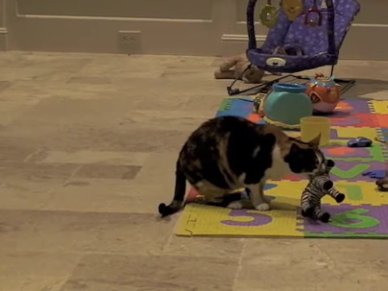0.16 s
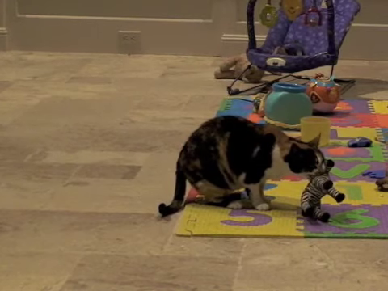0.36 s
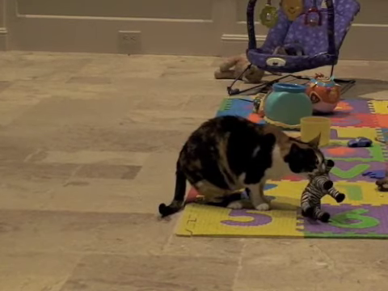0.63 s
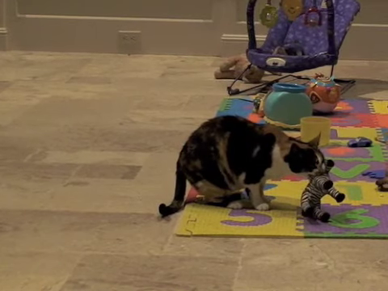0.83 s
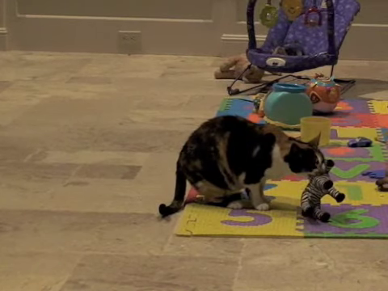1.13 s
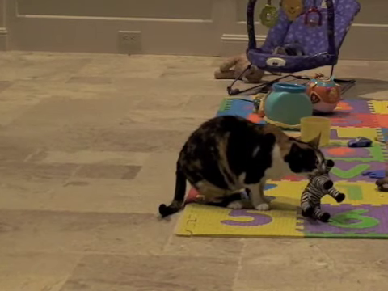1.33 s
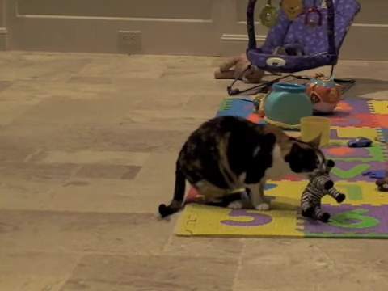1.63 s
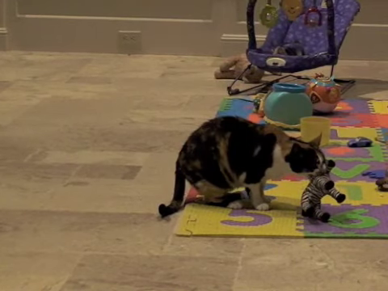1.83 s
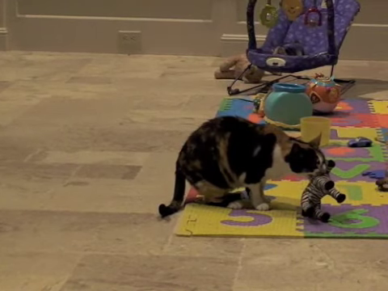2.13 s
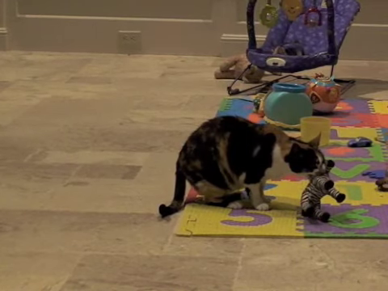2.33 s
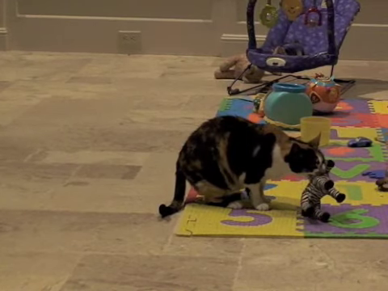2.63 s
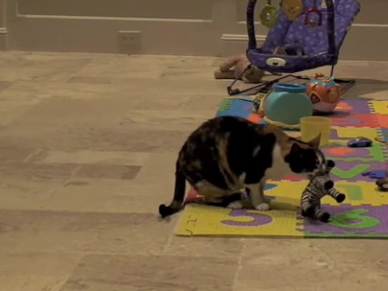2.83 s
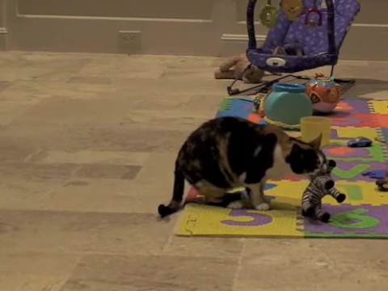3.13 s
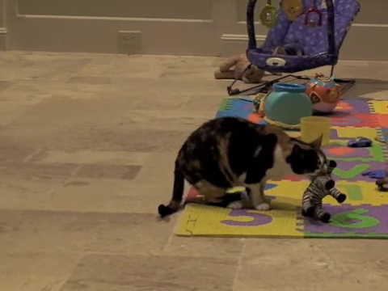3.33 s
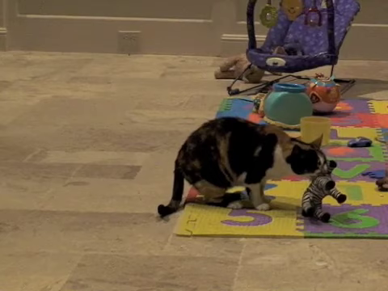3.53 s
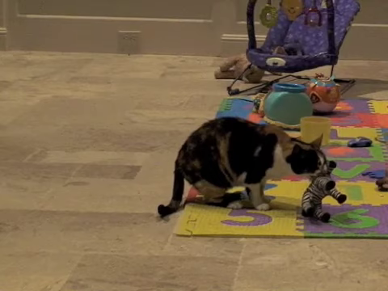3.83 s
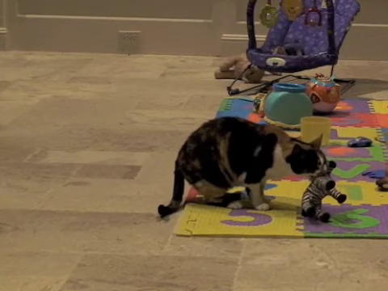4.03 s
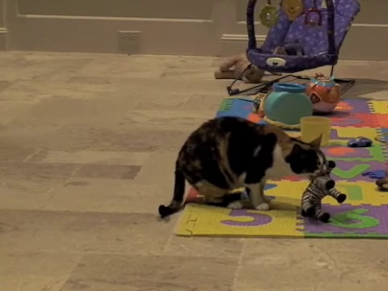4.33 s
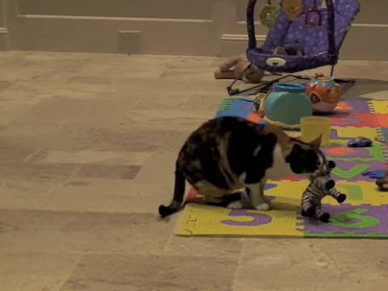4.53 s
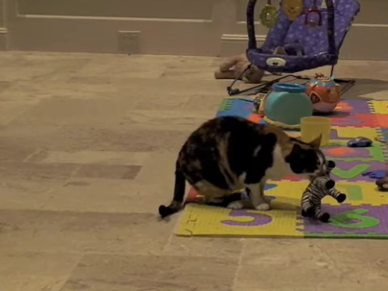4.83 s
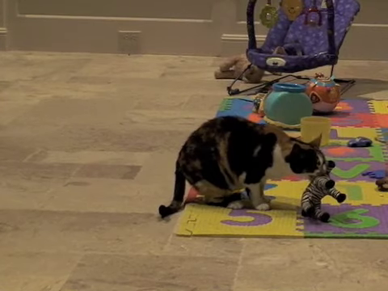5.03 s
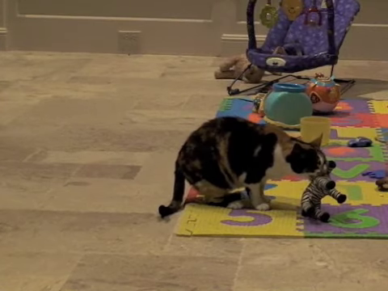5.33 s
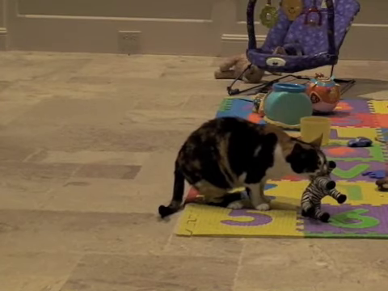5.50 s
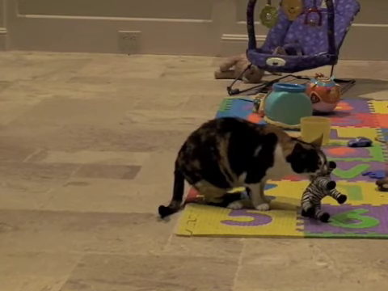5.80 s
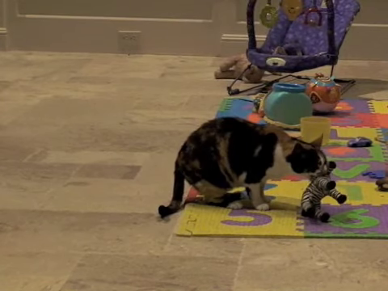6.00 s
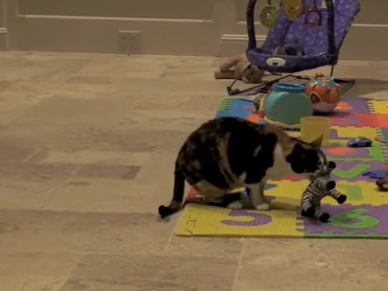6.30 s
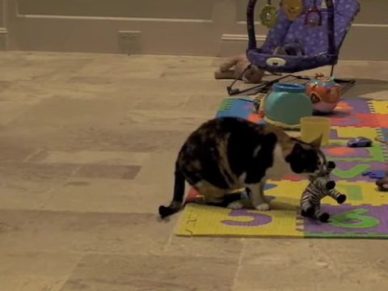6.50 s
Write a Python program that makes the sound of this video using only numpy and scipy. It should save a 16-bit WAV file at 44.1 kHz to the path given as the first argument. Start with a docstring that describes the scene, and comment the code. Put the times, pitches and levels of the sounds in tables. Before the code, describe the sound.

Quiet indoor room tone with a low, slowly swelling rumble. A cat yowls mournfully, its mid-high voice dipping and rising again as the mouth opens and closes. Three full calls follow the end of an earlier one, the middle one loudest and hoarse at its height, each breaking off into soft moans. Hard floor and walls leave a ringing tail over a second long; the microphone is a few metres away.

```python
"""In a bare, tiled room with a low ventilation rumble, an old cat sits on a play mat a few metres away.
We enter on the end of one yowl; three more follow, and each of the four breaks off into soft moans.
Each yowl is a stack of vocal-fold harmonics that sags in pitch and climbs again, shaped by a moving jaw.
Her parting lips are short ringing clicks, the soft bumps are noise pushed into dull resonances,
and the hard room is decaying noise convolved with cat, lips and bumps."""
import sys
import numpy as np
from scipy import signal
from scipy.fft import rfft, irfft, next_fast_len
from scipy.io import wavfile

SR = 44100
rng = np.random.default_rng(int(sys.argv[2]) if len(sys.argv) > 2 else 0)


def unload_audio(sound):
    """Save the sound as a 16-bit wav file, at the path given as the first command line argument."""
    columns = np.transpose(np.atleast_2d(sound))
    # keep every value between -1 and 1, then stretch to whole-number steps
    steps = np.round(np.clip(columns, -1, 1) * 32767)
    wavfile.write(sys.argv[1], SR, steps.astype(np.int16))


N = 293706
# the scene is built from a little before time 0, so that the room already rings when we enter
LEAD = int(0.6 * SR)
TIME = np.arange(-LEAD, N) / SR


def undb(db):
    """Decibels to amplitude gain."""
    return 10 ** (np.asarray(db) / 20)


def unit(x):
    """Scale to rms 1."""
    return x / np.sqrt(np.mean(x ** 2))


def gain_at(hz, points):
    """Gain of a (Hz, dB) spectrum, joined on a log-frequency axis."""
    f, db = np.transpose(points)
    return undb(np.interp(np.log(hz + 1), np.log(f), db))


def colour(x, response):
    """Filter by a gain that is a function of frequency."""
    size = next_fast_len(len(x))
    spectrum = rfft(x, size) * response(np.fft.rfftfreq(size, 1 / SR))
    return irfft(spectrum, size)[:len(x)]


def resonance(hz, centre_hz, width_hz):
    """Complex gain of a two-pole resonator, 1 in the bass."""
    return 1 / (1 - (hz / centre_hz) ** 2 + 1j * hz * width_hz / centre_hz ** 2)


def hump(hz, centre_hz, width_hz):
    """Bell from 0 to 1 around a resonance, half as high at width_hz to either side."""
    return 1 / (1 + ((hz - centre_hz) / width_hz) ** 2)


def bell(t, centre_s, half_s):
    """Smooth rise from 0 to 1 and back."""
    return np.exp(-((t - centre_s) / half_s) ** 2)


def ease(share):
    """Quarter sine from 0 to 1: quick at first, then level."""
    return np.sin(np.pi / 2 * np.clip(share, 0, 1))


def walk(t, rate):
    """Random wander with about `rate` turns a second."""
    steps = rng.standard_normal(8192)
    return np.interp((t - t[0]) * rate, np.arange(len(steps)), steps)


def during(start, length):
    """The sample times of one call."""
    return TIME[(TIME > start) & (TIME < start + length)]


def ports(mid, side, width):
    """Left and right of a diffuse sound: the stronger the side signal, the less alike they are."""
    side = colour(side, lambda f: gain_at(f, width))
    return np.array([mid + side, mid - side])


# spectrum of the still air of the room, before it is set to AIR_DB: frequency_hz, relative_level_db_per_hz
AIR_SPECTRUM = [(25, -10), (50, -6), (90, 1.5), (125, 0.5), (170, -3), (300, -5.5), (600, -4.5),
                (1200, -10.5), (2500, -17), (4000, -19), (6500, -24.5), (10500, -30.5), (12000, -26),
                (15500, -30.5)]
# stereo width of that air, which comes from all sides: frequency_hz, side_minus_mid_db
AIR_WIDTH = [(50, -25), (125, -22), (170, -14), (260, -8.5), (500, -5.5), (1300, -3), (2100, -2),
             (5600, -3.5), (10500, -2.5), (11200, -6), (12000, -38)]
# the low rumble and hum swell and ebb: time_s, gain_db
RUMBLE_SWELL = [(0, -0.5), (1.2, -1.5), (3, -2.5), (4.2, 0.5), (5.3, 1), (6.6, 1)]
AIR_DB = -55.5
HUM_HZ, HUM_DB = 123.1, -67  # hum level before its waver and the swell


def ventilation(hum_waver_db=3, rumble_hz=200):
    """Steady hiss of the house over a slowly swelling rumble and a faint wavering motor hum."""
    mid, side = (unit(colour(rng.standard_normal(len(TIME)), lambda f: gain_at(f, AIR_SPECTRUM)))
                 for _ in range(2))
    air = ports(mid, side, AIR_WIDTH) * undb(AIR_DB)
    rumble = np.array([colour(channel, lambda f: 1 / (1 + (f / rumble_hz) ** 4)) for channel in air])
    steady_hiss = air - rumble
    hum_phase = 2 * np.pi * HUM_HZ * TIME + 1.14 * walk(TIME, 5)
    hum_gain = undb(HUM_DB + hum_waver_db * walk(TIME, 2))
    hum = np.sqrt(2) * np.sin(hum_phase) * hum_gain
    swell = undb(np.interp(TIME, *np.transpose(RUMBLE_SWELL)))
    return steady_hiss + (rumble + hum) * swell


# how long the room rings: frequency_hz, t60_s
RING_TIMES = [(450, 1.3), (950, 1.38), (1350, 1.62), (2000, 1.55), (3200, 1.2), (6000, 1.05)]
# she faces away, so the walls get more of her treble than the listener: frequency_hz, reflected_share_db
FACING_AWAY = [(400, -1.5), (500, 0), (830, .5), (1000, -2), (1300, 1.3), (1700, 4), (2300, 5), (6000, 4)]
# stereo width of the echoes: frequency_hz, side_minus_mid_db
ECHO_WIDTH = [(100, -22), (250, -12), (500, -13), (1000, -10.5), (2000, -9), (4000, -7.5), (9000, -6)]
TAIL_DB, EARLY_DB = -2.5, -17


def room(x, direct_db=-2, early_s=0.056, gap_s=0.0049):
    """Direct sound, dense early reflections off tiles and walls, and a tail longest in the mid range."""
    t = np.arange(int(1.5 * SR)) / SR
    centres, t60s = np.transpose(RING_TIMES)

    def echoes():
        """One noise response: overlapping bands, each with its own decay, plus a short early burst."""
        noise = rng.standard_normal(len(t))
        bands = [colour(noise, lambda f: np.interp(f, centres, share)) for share in np.eye(len(centres))]
        tail = sum(band * 1000 ** (-t / t60) for band, t60 in zip(bands, t60s))
        tail = tail * np.sqrt(2 * np.log(1000) / (t60s.mean() * SR))
        early = rng.standard_normal(len(t)) * np.exp(-t / early_s) * np.sqrt(2 / (early_s * SR))
        return (undb(TAIL_DB) * tail + undb(EARLY_DB) * early) * (t > gap_s)

    radiated = colour(x, lambda f: gain_at(f, FACING_AWAY))
    response = ports(echoes(), echoes(), ECHO_WIDTH)
    wet = signal.fftconvolve(radiated[None], response, axes=1)[:, :len(x)]
    return undb(direct_db) * x + wet


# brief dropouts and swells of single low harmonics: centre_s, half_length_s, centre_hz, gain_db
FLUTTERS = [(3.123, 0.03, 870, -11), (3.224, 0.015, 855, 5), (3.347, 0.013, 855, -9),
            (3.556, 0.032, 1280, 5.5), (3.609, 0.025, 420, -17), (3.703, 0.022, 410, -12),
            (3.932, 0.015, 420, 7), (3.986, 0.015, 1280, -14), (4.094, .005, 880, -6),
            (4.1, .008, 880, 9.5), (5.428, 0.027, 890, -6), (5.572, 0.015, 890, -18),
            (5.667, 0.027, 870, -21), (5.67, 0.031, 435, 2), (5.836, 0.055, 445, -13),
            (5.903, 0.028, 890, 5), (6.252, .007, 980, -6), (6.266, .006, 980, 2)]


def flutter(x, width_hz=260):
    """Single harmonics briefly drop out or swell: a narrow band is turned down or up for a moment."""
    out = x
    for at, half_s, centre_hz, db in FLUTTERS:
        band = colour(x, lambda f: np.exp(-((f - centre_hz) / width_hz) ** 4))
        out = out + band * (undb(db) - 1) * bell(TIME, at, half_s)
    return out


# soft bumps and taps on the floor, levels before the room:
# start_s, level_db, centre_hz, decay_s, damping (resonance width over centre, no unit)
FLOOR_BUMPS = [(0.59, -44.5, 200, 0.033, 2.7), (1.603, -48.5, 155, 0.008, 0.58),
               (1.631, -46.5, 104, 0.017, 0.48), (2.577, -52, 750, 0.0097, 1.1),
               (4.67, -57, 65.2, 0.09, 1.5), (4.698, -47, 1300, .006, 0.29)]


def bump(start, db, centre_hz, decay_s, damping, soft_hz=1500):
    """A soft, scuffing push: decaying noise drives one dull resonance."""
    age = TIME - start
    envelope = (age > 0) * np.exp(-np.maximum(age, 0) / decay_s)
    push = rng.standard_normal(len(TIME)) * envelope

    def floor(f):
        return 1j * f * resonance(f, centre_hz, damping * centre_hz) / (1 + 1j * f / soft_hz)

    return unit(colour(push, floor)) * np.sqrt(np.mean(envelope ** 2)) * undb(db)


# lips parting: start_s, level_db (before the click's rise, decay and the room)
LIP_POPS = [(1.706, -37.5), (3.003, -43), (5.268, -37)]


def lip_pop(start, db, mouth_hz=1230, decay_s=0.0029, rise_s=0.0016):
    """The lips part and the air in the mouth rings for a few cycles."""
    age = np.maximum(TIME - start, 0)
    ring = np.sqrt(2) * np.sin(2 * np.pi * mouth_hz * age)
    return undb(db) * ring * np.exp(-age / decay_s) * (1 - np.exp(-age / rise_s))


def hiss(t, pitch, db, centre_hz=5200, width_hz=850, edge_s=.04):
    """Hoarse turbulence, puffed once a cycle."""
    noise = colour(rng.standard_normal(len(t)), lambda f: hump(f, centre_hz, width_hz))
    puffs = 1 + np.cos(2 * np.pi * np.cumsum(pitch) / SR)
    edges = ease(np.minimum(t - t[0], t[-1] - t) / edge_s)
    return np.interp(TIME, t, unit(noise * puffs) * undb(db) * edges, left=0, right=0)


# fixed colour of larynx and throat: frequency_hz, gain_db
THROAT_COLOUR = [(420, 3.7), (490, -.5), (840, 5), (1000, 1.4), (1300, 3.4), (1480, -1.5), (1700, -.5),
                 (1900, 0.7), (2130, -2.5), (2600, -2.2), (3300, -2.5), (4000, -1), (4800, 3), (5800, 3.5),
                 (7000, 1.5)]
# a thin, high ring is strongest at the start of a call and then dies away
RING_HZ, RING_WIDTH_HZ, RING_DB, RING_FADE_S = 5770, 260, 10.5, 0.69
# below this level the voice counts as soft: pinched in colour, richer in its fundamental
PLAIN_DB = -40


def voice(t, pitch, db, mouth, throat, upper, twang_db, fundamental_db,
          mouth_width_hz=235, throat_width_hz=370, throat_peak_db=12.5,
          upper_width_hz=340, upper_peak_db=11, twang_hz=1760,
          jitter=0.0026, waver=0.0016, shimmer_db=1.08, rasp_db=-34, unsteady=0.52,
          hoot_db_per_db=0.02, opening_hoot_db=3, opening_s=0.13, count=21):
    """Vocal-fold harmonics through three resonances set by jaw, tongue and lips, and a fixed high ring."""
    age = t - t[0]
    # on little air the folds beat unevenly; at full voice they lock in
    rough = undb(unsteady * np.clip(-31.5 - db, -10, 15))
    pitch = pitch * (1 + rough * (jitter * walk(t, 220) + waver * walk(t, 36.18)))
    phase = 2 * np.pi * np.cumsum(pitch) / SR
    k = np.arange(1, count + 1)[:, None]
    hz = k * pitch
    peaks_db = throat_peak_db * hump(hz, throat, throat_width_hz)
    peaks_db = peaks_db + upper_peak_db * hump(hz, upper, upper_width_hz)
    peaks_db = peaks_db + RING_DB * np.exp(-age / RING_FADE_S) * hump(hz, RING_HZ, RING_WIDTH_HZ)
    # pinched folds close more sharply and lift the upper harmonics
    lift_db = twang_db / (1 + (twang_hz / hz) ** 6)
    # a soft voice keeps more of its fundamental, most of all while the mouth is just opening
    hoot_db = fundamental_db + hoot_db_per_db * (PLAIN_DB - db) + opening_hoot_db * np.exp(-age / opening_s)
    gains = gain_at(hz, THROAT_COLOUR) * resonance(hz, mouth, mouth_width_hz)
    gains = gains * undb(peaks_db + lift_db + (k == 1) * hoot_db)
    # keep the power even, so that the level follows effort alone
    power = (abs(gains) ** 2).sum(0) / 2
    tone = (gains * np.exp(1j * k * phase)).real.sum(0) / np.sqrt(power)
    # a little turbulence escapes once a cycle
    rasp = rng.standard_normal(len(t)) * (1 + np.cos(phase))
    rasp = unit(colour(rasp, lambda f: gain_at(f, THROAT_COLOUR) * abs(resonance(f, 2100, 2000))))
    edges = np.clip(np.minimum(age, t[-1] - t) / 0.0048, 0, 1)
    level = undb(db + shimmer_db * walk(t, 59.6))
    sound = (tone + undb(rasp_db + twang_db) * rough * rasp) * edges * level
    return np.interp(TIME, t, sound, left=0, right=0)


# the throat and upper resonances rise with the jaw, the throat steeply as it gets wide
SHUT_THROAT_HZ, WIDE_THROAT_HZ, THROAT_POWER = 2320, 3150, 1.4
SHUT_UPPER_HZ, WIDE_UPPER_HZ, UPPER_POWER = 3820, 4850, 0.89
# soft moans that trail a yowl as the mouth shuts, levels at the start and before the room:
# start_s, length_s, pitch_hz, level_db, mouth_resonance_hz, twang_db
SOFT_MOANS = [(.08, 0.18, 483.5, -54, 830, -2), (0.228, 0.18, 479, -50, 970, -6),
              (2.26, 0.15, 486, -57, 770, 1), (4.315, 0.14, 488, -54, 760, 0),
              (6.385, 0.14, 493, -51.5, 740, 9)]


def moan(start, length, pitch_hz, db, mouth_hz, twang_db,
         fade_db_per_s=22, fundamental_db=1.0, release_s=0.061, release_db=-10):
    """A soft, steady note that dies away through a nearly shut mouth."""
    t = during(start, length)
    release = 1 - ease((t[-1] - t) / release_s)
    level_db = db - fade_db_per_s * (t - start) + release_db * release
    return voice(t, pitch_hz, level_db, mouth_hz, SHUT_THROAT_HZ, SHUT_UPPER_HZ, twang_db, fundamental_db,
                 jitter=0.00085, waver=.0006)


# every yowl swells from FIRST_DB; its pitch drops quickly and climbs ever faster to the last note
FIRST_DB, CLIMB_POWER = -47, 1.6
# the jaw turns at this share of the call, then closes and ends nearly shut
JAW_TURN_SHARE, JAW_CLOSE_POWER, SHUT_MOUTH_HZ, WIDE_MOUTH_HZ = 0.48, 1.86, 955, 1433
# on little air the voice is pinched: twang grows as the level falls, but needs a moment to set in
TWANG_DB_PER_DB, SOFT_ONSET_DB = 1.29, -11
# at the height of the longest yowl the voice strains: the pitch gives way and the colour brightens
STRAIN_AT_S, STRAIN_HALF_S, STRAIN_SAG_HZ, STRAIN_THROAT_HZ = 3.72, .11, 23.4, 190
STRAIN_COLOUR_LAG_S, STRAIN_COLOUR_HALF_S = 0.11, .14
STRAIN_UPPER_HZ, STRAIN_TWANG_DB, STRAIN_HISS_DB = 750, 10, 9
STRAIN_SHAKE_HZ, STRAIN_SHAKES_PER_S = 3, 85
# the calls, levels before the room: start_s, length_s, swell_s, fade_s, peak_level_db, last_level_db,
# first_pitch_hz, low_pitch_hz, last_pitch_hz, first_drop_s (time constant), final_climb_s,
# first_mouth_resonance_hz, mid_call_mouth_resonance_hz, base_twang_db, twang_bloom_s,
# base_hiss_db, fundamental_lift_db, base_rasp_db (before twang and roughness)
CAT_YOWLS = [(-.55, 0.66, 0.15, 0.32, -38.5, -45, 498.8, 439, 501.5, 0.047, .42, 990, 1180, -2, .03, -67, 1.5, -19.5),
             (1.709, 0.55, 0.3, 0.46, -41.5, -43.5, 521, 466.1, 529, .075, 0.31, 1230, 814, -4.5, 0.068, -92, 1, -34),
             (3.002, 1.312, 0.57, 0.71, -28.5, -43.5, 501.8, 427.3, 515.4, .048, 0.42, 1045, 1472, -0.6, 0.047, -79, 0.5, -28),
             (5.28, 1.106, 0.53, 0.55, -37.5, -41.5, 539.5, 430.5, 511.6, 0.06, 0.81, 960, 1190, -4.5, .028, -77, 1.5, -34)]


def yowl(start, length, swell_s, fade_s, peak_db, last_db, first_hz, low_hz, last_hz, drop_s, climb_s,
         first_mouth_hz, mid_mouth_hz, twang_db, bloom_s, hiss_db, fundamental_db, rasp_db):
    """One call: effort swells, eases off and breaks; pitch drops, lies low and climbs; the jaw moves."""
    t = during(start, length)
    age, left = t - start, start + length - t
    swell = (FIRST_DB - peak_db) * (1 - ease(age / swell_s))
    fade = (last_db - peak_db) * (1 - ease(left / fade_s))
    db = peak_db + swell + fade
    strain = bell(t, STRAIN_AT_S, STRAIN_HALF_S)
    bright = bell(t, STRAIN_AT_S + STRAIN_COLOUR_LAG_S, STRAIN_COLOUR_HALF_S)

    drop = np.exp(-age / drop_s)
    climb = np.maximum(1 - left / climb_s, 0) ** CLIMB_POWER
    pitch = low_hz + (first_hz - low_hz) * drop + (last_hz - low_hz) * climb
    pitch = pitch - STRAIN_SAG_HZ * strain + STRAIN_SHAKE_HZ * bright * walk(t, STRAIN_SHAKES_PER_S)

    turn_s = JAW_TURN_SHARE * length
    mouth = first_mouth_hz + (mid_mouth_hz - first_mouth_hz) * ease(age / turn_s)
    closing = np.minimum(left / (length - turn_s), 1) ** JAW_CLOSE_POWER
    mouth = SHUT_MOUTH_HZ + (mouth - SHUT_MOUTH_HZ) * closing
    gape = np.maximum(mouth - SHUT_MOUTH_HZ, 0) / (WIDE_MOUTH_HZ - SHUT_MOUTH_HZ)
    throat = SHUT_THROAT_HZ + (WIDE_THROAT_HZ - SHUT_THROAT_HZ) * gape ** THROAT_POWER
    throat = throat + STRAIN_THROAT_HZ * strain
    upper = SHUT_UPPER_HZ + (WIDE_UPPER_HZ - SHUT_UPPER_HZ) * gape ** UPPER_POWER
    upper = upper + STRAIN_UPPER_HZ * bright

    pinch = TWANG_DB_PER_DB * (PLAIN_DB - db)
    twang = twang_db + pinch + SOFT_ONSET_DB * np.exp(-age / bloom_s) + STRAIN_TWANG_DB * bright
    call = voice(t, pitch, db, mouth, throat, upper, twang, fundamental_db, rasp_db=rasp_db)
    return call + hiss(t, pitch, hiss_db + STRAIN_HISS_DB * bright)


def scene():
    """Cat, lips and bumps in the room, over the ventilation."""
    bumps = sum(bump(*row) for row in FLOOR_BUMPS)
    lips = sum(lip_pop(*row) for row in LIP_POPS)
    cat = sum(yowl(*row) for row in CAT_YOWLS) + sum(moan(*row) for row in SOFT_MOANS)
    heard = np.array([flutter(channel) for channel in room(cat + lips + bumps)])
    return (heard + ventilation())[:, LEAD:]


def record(dry, top_hz=15700):
    """A steep elliptic low-pass cuts the top."""
    return signal.sosfilt(signal.ellip(10, .2, 80, top_hz, fs=SR, output="sos"), dry)


dry = scene()
out = record(dry)
unload_audio(out)
```